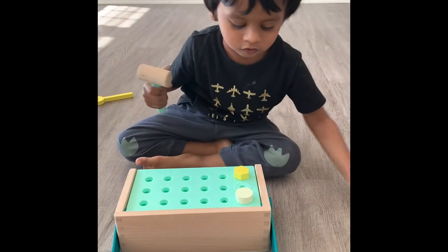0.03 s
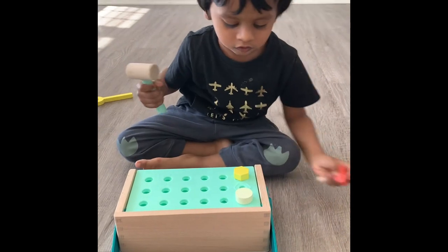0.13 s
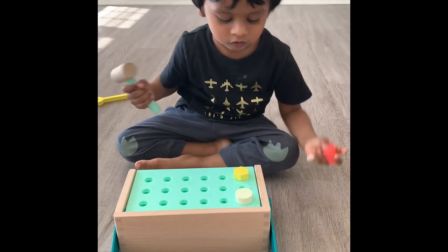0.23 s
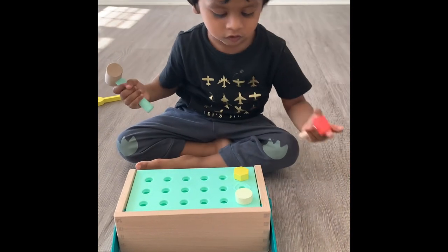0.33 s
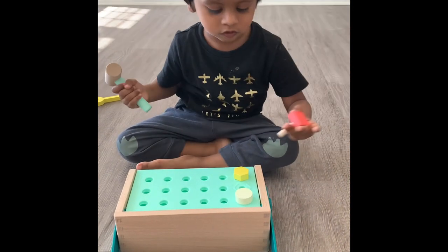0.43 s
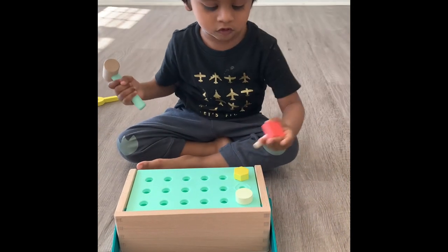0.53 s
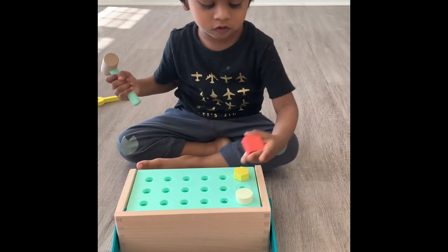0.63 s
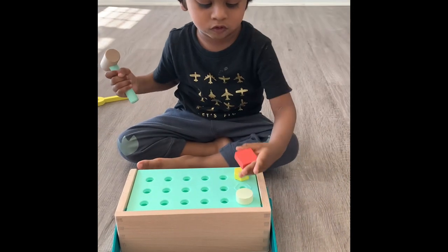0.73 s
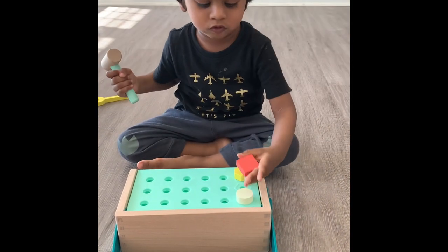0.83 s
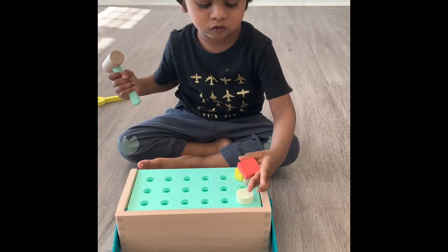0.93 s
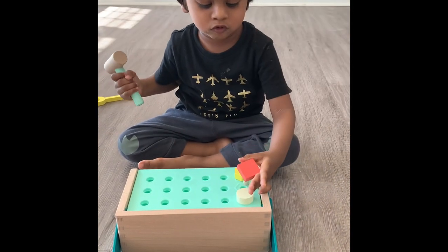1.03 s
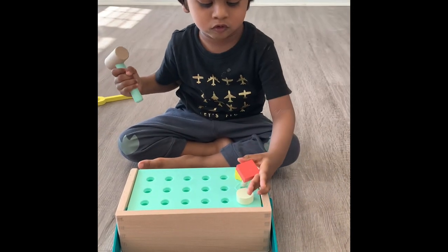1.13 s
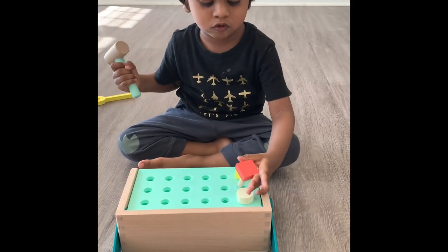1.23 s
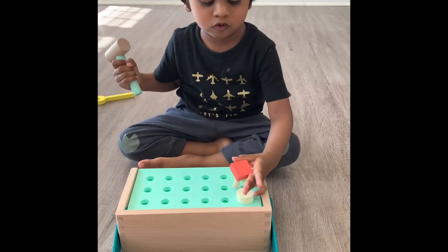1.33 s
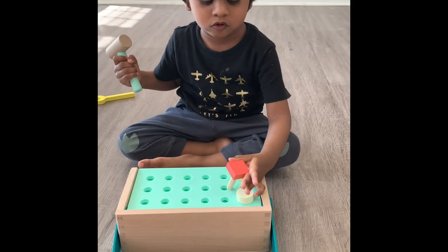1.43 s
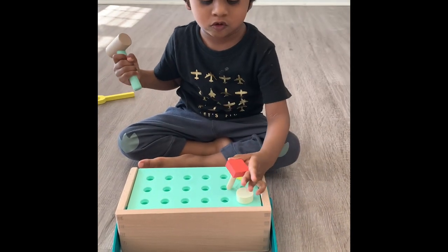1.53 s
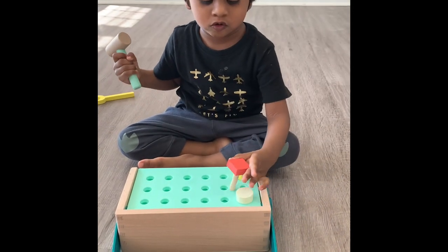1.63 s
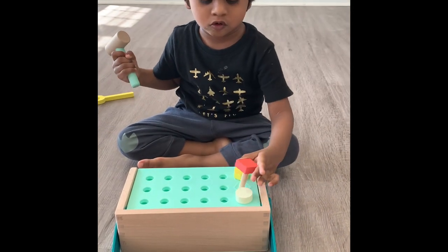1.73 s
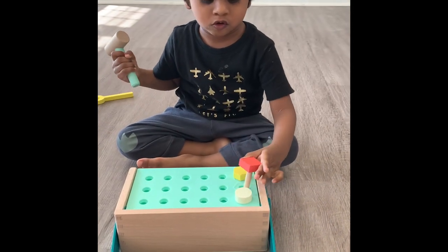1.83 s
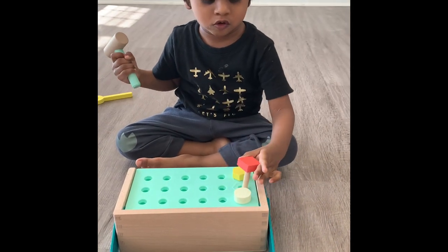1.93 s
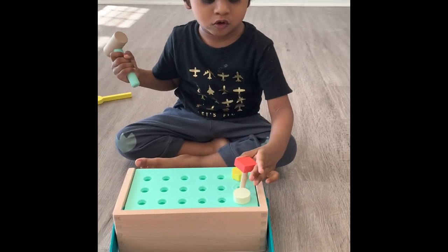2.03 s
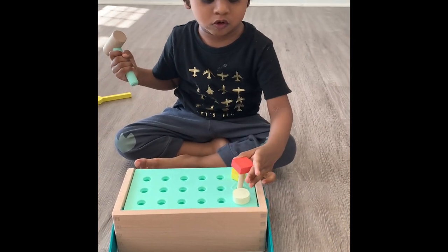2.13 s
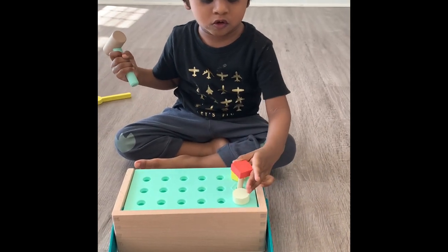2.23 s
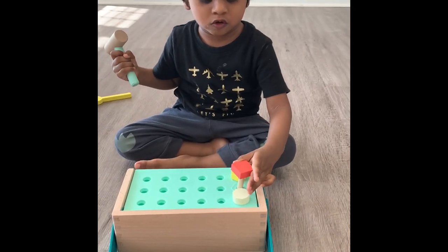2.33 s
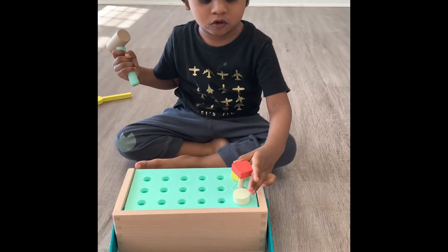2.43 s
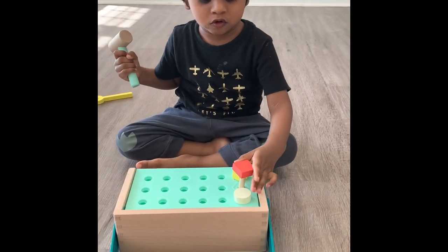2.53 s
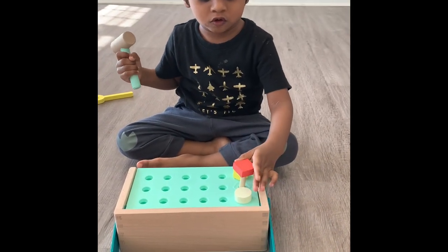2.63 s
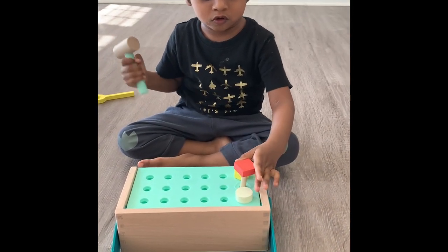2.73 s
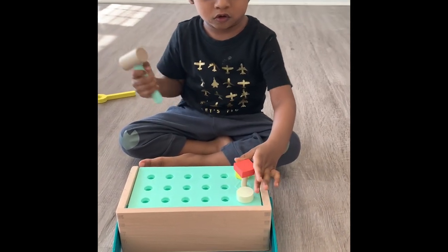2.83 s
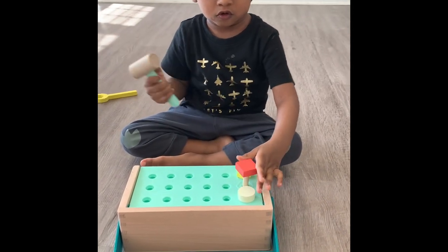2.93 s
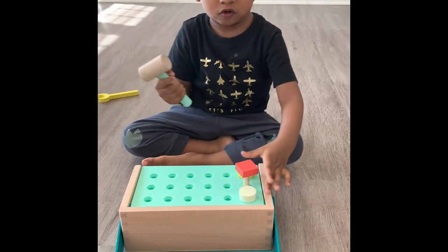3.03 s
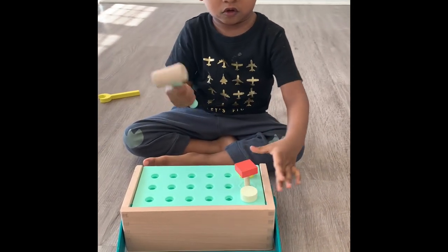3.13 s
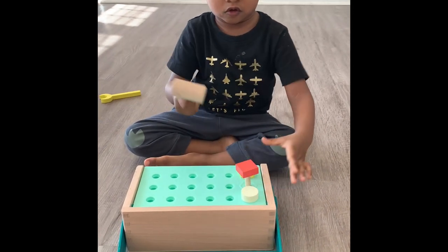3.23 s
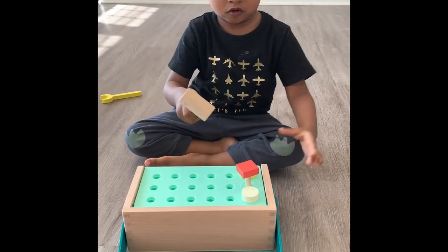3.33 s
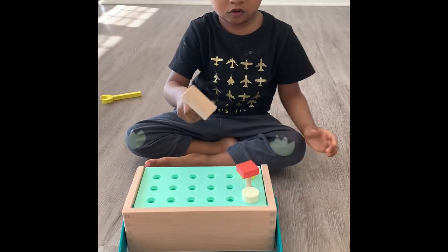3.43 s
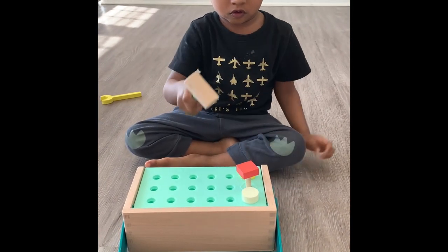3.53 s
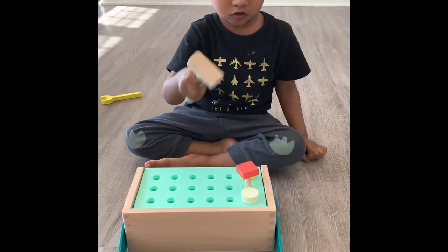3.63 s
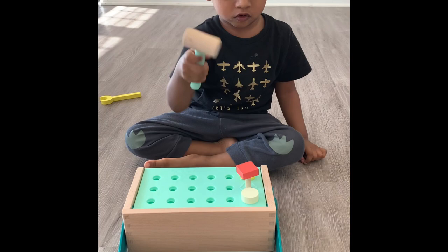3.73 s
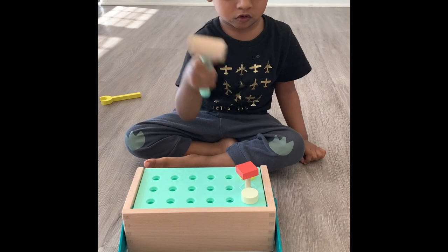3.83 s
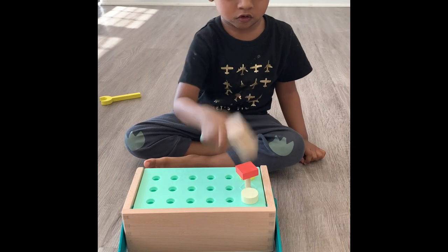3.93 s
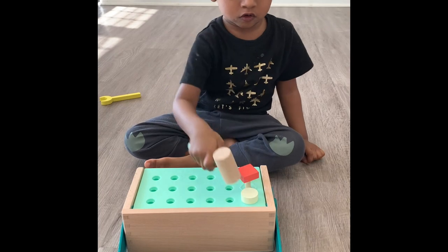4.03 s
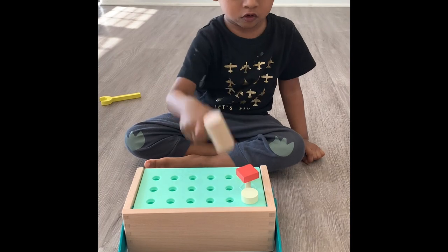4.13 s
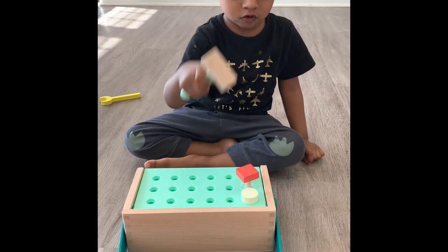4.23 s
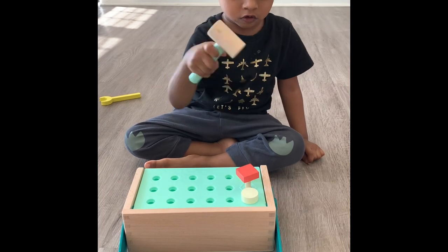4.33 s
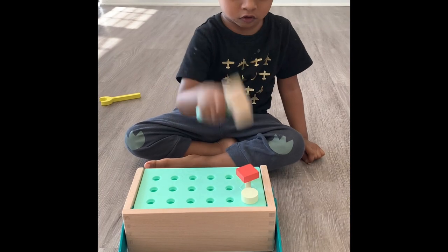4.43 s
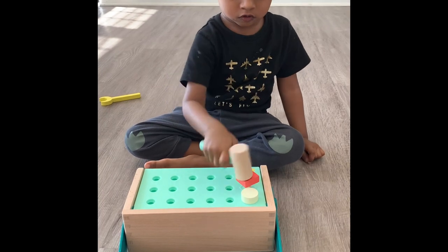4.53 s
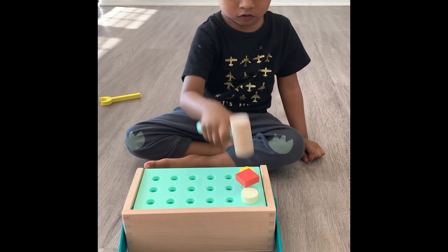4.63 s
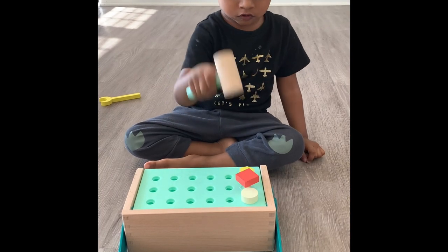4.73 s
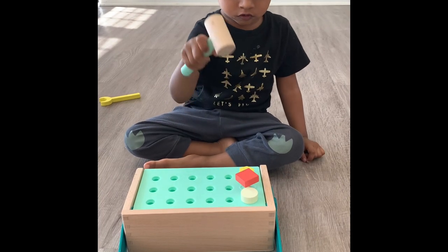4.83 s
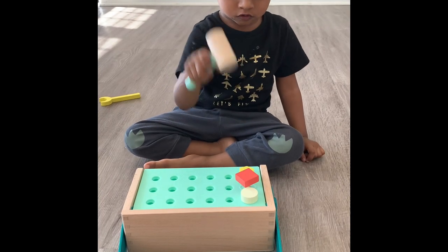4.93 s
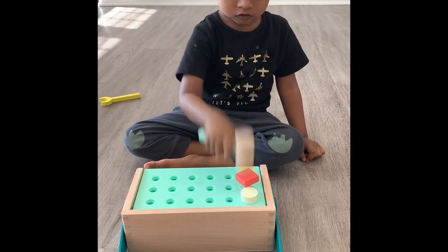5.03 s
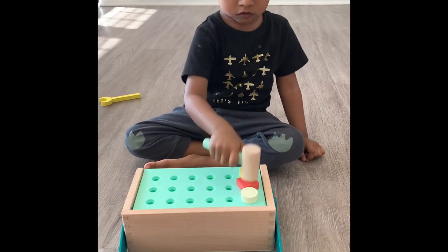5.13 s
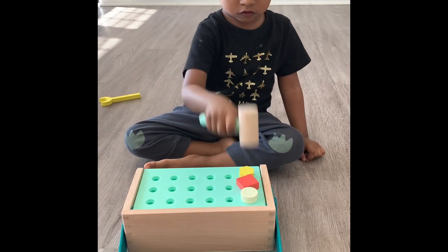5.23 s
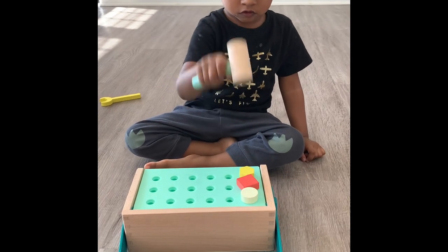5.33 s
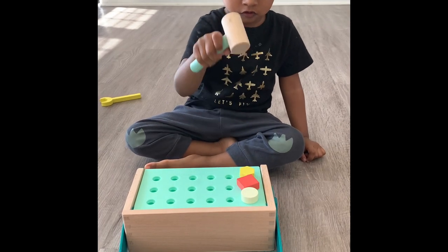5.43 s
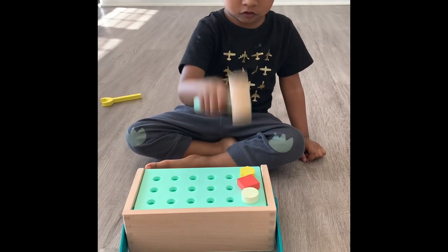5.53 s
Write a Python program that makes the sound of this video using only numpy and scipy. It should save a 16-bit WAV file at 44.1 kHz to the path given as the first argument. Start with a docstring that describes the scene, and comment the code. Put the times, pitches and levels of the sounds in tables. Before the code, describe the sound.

In a bare, echoing room with a low ventilation hum, a wooden peg clicks and scrapes lightly against a toy box lid for about two seconds. After a quiet pause, three loud wooden mallet blows land half a second apart, each with a bright crack, hollow box thump and floor thud. Close microphone in front, slight stereo.

```python
"""On the floor of a bare, ringing room, a child fits a wooden peg into the lid of a wooden toy box.
Light taps and rubs come from noise grains and clicks passed through the resonances of the peg's block.
Three mallet blows then drive the peg in: each cracks, rings the lid and thumps the box on the floorboards.
Filtered noise echoes every knock, and a ventilation hum of noise and steady tones runs underneath."""
import sys
import numpy as np
from scipy import signal
from scipy.io import wavfile
from scipy.ndimage import uniform_filter1d

SR = 44100
rng = np.random.default_rng(int(sys.argv[2]) if len(sys.argv) > 2 else 0)


def persist_wave(psi):
    """Save psi, clipped to +-1, as 16-bit WAV."""
    counts = np.round(np.clip(psi, -1, 1) * 32767).astype(np.int16)
    wavfile.write(sys.argv[1], SR, np.atleast_2d(counts).T)


N = 246078
TIME = np.arange(N) / SR
HIT_TIME = TIME[:SR // 2]

# Spectrum of the air in the ducts, relative: frequency_hz [Hz], density_db [dB per Hz]
AIR_SPECTRUM = [(20, -12), (38, -19.5), (60, -9), (95, -6), (130, -4.5), (185, -11.5), (250, -11),
                (370, -16.5), (480, -18.5), (950, -25.5), (1500, -33.5), (2600, -44), (5000, -47),
                (15000, -51)]
# Humming duct resonances; two filters, each twice half_width_hz wide, shape the wavering part:
# pitch_hz [Hz], half_width_hz [Hz], wavering_db [dB rms], steady_db [dB rms]
DUCT_HUM = [(55.7, 6.7, -50, -61.5), (148.2, 6.7, -55.5, -51), (329.5, 12, -66, -70.5),
            (372, 40, -64, -80.5)]
# Likeness of diffuse sound at the left and right ports: frequency_hz [Hz], correlation [-1 to 1]
PORT_LIKENESS = [(60, 1), (140, 1), (300, 0.74), (650, -0.4), (1400, 0.46), (3100, -0.55), (7000, 0.36),
                 (15000, -0.4)]
# The peg slid or twisted against the wood, level taken before the low-pass:
# start_s [s], length_s [s], level_db [dB], brightness_hz [Hz]
RUBS_ON_WOOD = [(0.0, 0.0033, -53.5, 12900), (0.859, 0.049, -57.5, 3220), (1.11, 0.03, -58.5, 3000),
                (1.303, 0.025, -61.5, 2510), (1.335, .04, -61, 3300), (1.602, 0.026, -53, 3150),
                (1.632, 0.011, -55, 8100), (1.931, 0.018, -57, 3000), (2.11, 0.016, -56, 3000),
                (2.818, 0.16, -70.5, 3300)]
# The peg touching floor, lid and hole:
# start_s [s], click_db [dB], lid_db [dB], brightness_hz [Hz], note_hz [Hz], note_db [dB]
PEG_TAPS = [(0.002, -26.5, -24.5, 6400, 1396, -18.5), (0.8567, -26, -32.5, 1980, 405, -14.5),
            (1.1231, -37.5, -45, 2480, 400, -52), (1.304, -50, -28, 1205, 361, -21),
            (1.3557, -31, -19, 1180, 347, -12), (1.6230, -27, -26, 2500, 874, -24.5),
            (1.6456, -23.5, -45, 5170, 880, -22.5), (1.6491, -31, -24.5, 2770, 2200, -22),
            (1.7041, -42, -23.5, 1600, 345, -18), (1.9388, -42, -36, 2000, 410, -19),
            (2.1357, -18, -25, 6970, 1800, -23), (2.1432, -20, -46, 5040, 2210, -19.5),
            (3.568, -50, -56, 17800, 6900, -37.5), (3.5850, -55, -63, 17900, 11800, -35)]
# The peg's block head, held in the fingers: pitch_hz [Hz], width_hz [Hz], level_db [dB, relative]
BLOCK_RESONANCES = [(2000, 470, -5), (2200, 160, 3), (2900, 660, -4), (4300, 670, -8), (5520, 510, -6),
                    (7300, 1800, -12), (13000, 4100, -16)]
# Modes of the lid and walls: pitch_hz [Hz], level_db [dB, relative], t60_s [s]
LID_MODES = [(440, -13, 0.23), (461.9, -10.5, 0.3), (524.4, -10.5, 0.16), (603, -7.5, 0.06),
             (700.6, -6.5, 0.061), (733, -8.5, 0.06), (761.8, -8, 0.11), (900, -3, 0.049), (955, -8, 0.2),
             (983, -13, 0.21), (1223, -9, 0.085), (1344, -2, 0.022), (1488, -8, 0.053), (1611, -9.5, 0.057),
             (1711, -7, 0.082), (2160, -13.5, 0.065), (2220, -20, 0.043), (2720, -9, 0.059),
             (3060, -13, 0.22), (3590, -6.5, 0.052), (4300, -7, 0.065)]
# Mallet blows, and last the peg bottoming out; slip_s is the time constant of the chatter:
# start_s [s], crack_db [dB], lid_db [dB], brightness_hz [Hz], slip_s [s], note_hz [Hz], note_db [dB]
MALLET_BLOWS = [(3.95, 9, 0.5, 16800, 0.002, 1330, -7.5), (4.4763, 12, 2.5, 9400, 0.004, 2100, -1.5),
                (5.0379, 9, 7, 3570, 0.004, 2070, 2.5), (5.052, -9, 4.5, 6800, 0.0018, 1765, 0)]
# Mallet head on the peg, heavily damped: pitch_hz [Hz], width_hz [Hz], level_db [dB, relative]
PEG_RESONANCES = [(1600, 500, -11), (2560, 460, -6), (3140, 900, -5), (4196, 1100, -4.5), (5680, 380, -2),
                  (6560, 1700, -6), (8250, 720, -4), (10410, 890, -4), (11840, 2200, -3.5)]
# The box pressed onto the floor, rebound_s counted from the start:
# start_s [s], box_db [dB], push_s [s], floor_db [dB], rebound_s [s], rebound_db [dB]
BOX_THUMPS = [(3.955, -2.5, 0.0017, -1.5, 0.047, -5), (4.481, 6, 0.0029, -14.5, 0.041, -4),
              (5.0516, 6, 0.003, -9, 0.045, -1)]
# Modes of the hollow box: pitch_hz [Hz], level_db [dB, relative], t60_s [s]
BOX_MODES = [(145, -16.5, 0.11), (224.5, -2.5, 0.04), (248.2, -0.5, .06), (303.3, 0, 0.059),
             (321, -1.5, 0.081), (392, -16, 0.17)]
# Modes of the floorboards: pitch_hz [Hz], level_db [dB, relative], t60_s [s]
FLOOR_MODES = [(85, -3, 0.093), (113, 1, 0.065), (155, -2.5, 0.15)]
# Strength of the room's ring: frequency_hz [Hz], level_db [dB against the sound sent into the room]
ROOM_LEVEL = [(80, -2), (200, -16.5), (450, 2.5), (1000, 0.5), (2000, -1.5), (3800, 2), (5000, -8),
              (7000, 1.5), (10000, -26), (13000, -5.5), (16000, -7)]
# Decay of the room's ring: frequency_hz [Hz], t60_s [s]
ROOM_DECAY = [(100, 0.46), (500, 0.74), (1500, 0.73), (4000, 0.71), (7500, 0.56), (12000, 0.32)]


def from_db(db):
    """Decibels to gain."""
    return 10 ** (np.asarray(db) / 20)


def rms_one(x):
    """Scale to rms 1."""
    return x / np.sqrt(np.mean(x ** 2) + 1e-20)


def energy_one(x):
    """Scale to the energy of a unit click."""
    return x / np.sqrt(np.sum(x ** 2) + 1e-20)


def at_hz(points, hz):
    """Read a table on a log-frequency axis."""
    table_hz, values = np.array(points).T
    return np.interp(np.log(hz), np.log(table_hz), values)


def add(track, start_s, sound):
    """Mix a sound into a track at its start time."""
    start = max(0, round(start_s * SR))
    track[start:start + len(sound)] += sound[:N - start]


def soften(x, hz, order=2):
    """Low-pass: a softer contact carries less treble."""
    sos = signal.butter(order, min(hz, .45 * SR), fs=SR, output="sos")
    return signal.sosfilt(sos, x + 1e-18)


def resonate(x, hz, width_hz):
    """One resonance, gain 1 on top."""
    radius = np.exp(-np.pi * width_hz / SR)
    feed = np.array([1, 0, -1]) * (1 - radius ** 2) / 2
    back = [1, -2 * radius * np.cos(2 * np.pi * hz / SR), radius ** 2]
    return signal.lfilter(feed, back, x + 1e-18)


def diffuse_bands(size):
    """Third-octave bands of sound arriving from all sides: (centre Hz, stereo noise)."""
    edges = 22 * 2 ** (np.arange(30) / 3)
    # Neighbouring bands draw on different noise; a quarter second lets the filters settle.
    white = rng.standard_normal((2, 2, size + SR // 4))
    for k, (low, high) in enumerate(zip(edges, edges[1:])):
        sos = signal.butter(2, [low, high], "band", fs=SR, output="sos")
        mid, side = signal.sosfilt(sos, white[k % 2])[:, -size:]
        hz = np.sqrt(low * high)
        alike = np.clip(at_hz(PORT_LIKENESS, hz), -.99, .995)
        shared = np.sqrt(1 + alike) * mid
        opposed = np.sqrt(1 - alike) * side * [[1], [-1]]
        yield hz, (shared + opposed) / np.sqrt(2)


def at_ports(x, pan_db, lag_s=.00013):
    """Sound from just ahead reaches the left port a moment sooner; positive pan_db leans left."""
    later = np.pad(x, (round(lag_s * SR), 0))[:N]
    return np.array([x * from_db(pan_db / 2), later * from_db(-pan_db / 2)])


def ventilation(air_db=-50.5):
    """Dull rushing air, with a wavering noise drone and a steady fan tone at each duct resonance."""
    rush = sum(from_db(at_hz(AIR_SPECTRUM, hz)) * band for hz, band in diffuse_bands(N))
    air = from_db(air_db) * rms_one(rush)
    hum = 0
    for hz, half_width_hz, wavering_db, steady_db in DUCT_HUM:
        drone = rng.standard_normal(N + SR)
        for _ in range(2):
            drone = resonate(drone, hz, 2 * half_width_hz)
        tone = np.sqrt(2) * np.sin(2 * np.pi * (hz * TIME + rng.random()))
        # The first second of drone is the filters settling.
        hum = hum + from_db(wavering_db) * rms_one(drone[SR:]) + from_db(steady_db) * tone
    return air * from_db([[-.6], [.6]]) + at_ports(hum, pan_db=-1.8)


def damped_wood(force, resonances):
    """The broad, short-lived resonances of a small piece of wood, neighbours in opposite sense."""
    return sum((-1) ** k * from_db(db) * resonate(force, hz, width_hz)
               for k, (hz, width_hz, db) in enumerate(resonances))


def ring(force, modes, uneven_db=1.5):
    """A force sets decaying sines going, neighbours in opposite sense, each a little uneven in level."""
    t = HIT_TIME
    answer = 0
    for k, (hz, db, t60_s) in enumerate(modes):
        gain = from_db(db + uneven_db * rng.standard_normal() - 60 * t / t60_s)
        answer = answer + (-1) ** k * gain * np.sin(2 * np.pi * hz * t)
    return signal.fftconvolve(force, answer)[:len(force)]


def stroke(start_s, length_s, attack_db_per_s=1503, ease_db_per_s=40, release_db_per_s=702):
    """Gain of one rub: it swells, eases as the fingers slow down, then stops."""
    t = TIME - start_s
    attack = attack_db_per_s * np.maximum(-t, 0)
    ease = ease_db_per_s * np.clip(t, 0, length_s)
    release = release_db_per_s * np.maximum(t - length_s, 0)
    return from_db(-attack - ease - release)


def rubbing(grains_per_s=600, uneven_db=4, lid_db=-6):
    """Wood grain catches in many tiny slips while the peg is wiggled in, exciting block and lid."""
    sizes = from_db(uneven_db * np.minimum(rng.exponential(1, N), 3)) * rng.choice([-1, 1], N)
    grains = sizes * (rng.random(N) < grains_per_s / SR)
    block = rms_one(damped_wood(grains, BLOCK_RESONANCES))
    wood = block + from_db(lid_db) * rms_one(ring(grains, LID_MODES))
    return sum(from_db(level_db) * stroke(start_s, length_s) * soften(wood, bright_hz, order=4)
               for start_s, length_s, level_db, bright_hz in RUBS_ON_WOOD)


def chatter(fade_s, slips_per_s):
    """A fading shower of tiny contacts, energy 1."""
    slips = rng.standard_normal(len(HIT_TIME)) * (rng.random(len(HIT_TIME)) < slips_per_s / SR)
    return energy_one(slips * np.exp(-HIT_TIME / fade_s))


def contact(slip_s, chatter_db):
    """A sharp first touch, then fading chatter as wood sticks and slips on wood."""
    touch = signal.unit_impulse(len(HIT_TIME))
    return touch + from_db(chatter_db) * chatter(slip_s, slips_per_s=7800)


def taps(note_damping=0.083, lid_cut_hz=650):
    """Light touches of the hand-held peg: block click, thin lid ring and a small note from the spot touched."""
    out = np.zeros(N)
    thin = signal.butter(2, lid_cut_hz, "high", fs=SR, output="sos")
    for start_s, click_db, lid_db, bright_hz, note_hz, note_db in PEG_TAPS:
        click = damped_wood(contact(slip_s=0.0024, chatter_db=8.5), BLOCK_RESONANCES)
        add(out, start_s, from_db(click_db) * energy_one(soften(click, bright_hz)))
        touch = soften(contact(slip_s=.002, chatter_db=-10.5), bright_hz)
        lid = signal.sosfilt(thin, ring(touch, LID_MODES))
        add(out, start_s, from_db(lid_db) * energy_one(lid))
        # The note's bandwidth is a fixed share of its pitch.
        note = resonate(soften(touch, note_hz), note_hz, note_damping * note_hz)
        add(out, start_s, from_db(note_db) * energy_one(note))
    return out


def mallet(rattle_db=-13, rattle_s=.012, lid_bright_hz=3000, note_width_hz=260):
    """Wood on wood: a bright crack, a short peg note, the lid's ring and a brief rattle of loose parts."""
    out = np.zeros(N)
    for start_s, crack_db, lid_db, bright_hz, slip_s, note_hz, note_db in MALLET_BLOWS:
        rattle = from_db(rattle_db) * chatter(rattle_s, slips_per_s=2200)
        force = energy_one(contact(slip_s, chatter_db=8)) + rattle
        crack = soften(damped_wood(force, PEG_RESONANCES), bright_hz, order=1)
        note = resonate(force, note_hz, note_width_hz)
        lid = soften(ring(contact(slip_s, chatter_db=-3.0), LID_MODES), lid_bright_hz, order=1)
        add(out, start_s, from_db(crack_db) * energy_one(crack))
        add(out, start_s, from_db(note_db) * energy_one(note))
        add(out, start_s, from_db(lid_db) * energy_one(lid))
    return out


def push(length_s):
    """A soft half-sine shove."""
    return np.sin(np.pi * np.minimum(HIT_TIME / length_s, 1))


def thumps(floor_lag_s=0.0018, floor_push_s=0.0064):
    """The driven peg shoves the hollow box; the boards give, and thud again as the box settles."""
    out = np.zeros(N)
    boards = energy_one(ring(push(floor_push_s), FLOOR_MODES))
    for start_s, box_db, push_s, floor_db, rebound_s, rebound_db in BOX_THUMPS:
        box = energy_one(ring(push(push_s), BOX_MODES))
        add(out, start_s, from_db(box_db) * box)
        add(out, start_s + floor_lag_s, from_db(floor_db) * boards)
        add(out, start_s + rebound_s, from_db(rebound_db) * boards)
    return out


def room(x, delay_s=0.003, build_s=0.0013):
    """Reflections thicken within milliseconds and die away, each band at its own pace."""
    t = np.maximum(TIME[:SR] - delay_s, 0)
    answer = 0
    for hz, band in diffuse_bands(SR):
        fade = (1 - np.exp(-t / build_s)) * from_db(-60 * t / at_hz(ROOM_DECAY, hz))
        answer = answer + from_db(at_hz(ROOM_LEVEL, hz)) * energy_one(fade) * band
    return signal.fftconvolve(x[None], answer, axes=1)[:, :N]


def scene(tap_room_db=-2):
    """The toy radiates differently each way: one direction comes straight, the room gathers all four."""
    low, rub = thumps(), rubbing()
    directions = [(mallet(), taps() + rub) for _ in range(4)]
    echoes = 0
    for blows, touches in directions:
        echoes = echoes + room(blows + low + from_db(tap_room_db) * touches)
    echoes = echoes / np.sqrt(len(directions))
    straight = at_ports(sum(directions[0]), pan_db=.4)
    return straight + at_ports(low, pan_db=-2.0) + echoes + ventilation()


def suppress_hiss(x, split_hz=2000, threshold_db=-68, depth_db=-12):
    """The recorder turns the treble down whenever it is faint, which shortens quiet tails."""
    bass = signal.sosfiltfilt(signal.butter(2, split_hz, fs=SR, output="sos"), x)
    treble = x - bass
    # Treble power over a 20 ms window, both channels together.
    power = np.maximum(uniform_filter1d(np.mean(treble ** 2, axis=0), size=SR // 50), 0)
    faint = 1 / (1 + power / from_db(threshold_db) ** 2)
    return bass + treble * from_db(depth_db * faint)


def record(dry, top=1.8, notch_hz=9850, notch_width_hz=1000, roll_off_hz=14300, low_cut_hz=42):
    """The microphone drops deep bass and a treble notch; hiss is suppressed, peaks rounded, the top cut."""
    low_cut = signal.butter(4, low_cut_hz, "high", fs=SR, output="sos")
    notch_edges = [notch_hz - notch_width_hz / 2, notch_hz + notch_width_hz / 2]
    notch = signal.butter(2, notch_edges, "stop", fs=SR, output="sos")
    x = signal.sosfilt(notch, signal.sosfilt(low_cut, dry))
    x = suppress_hiss(soften(x, roll_off_hz, order=8))
    rounded = top * np.tanh(x / top)
    # 70 dB down from 17 kHz upward
    top_cut = signal.cheby2(14, 70, 17000, fs=SR, output="sos")
    return signal.sosfilt(top_cut, rounded)


dry = scene()
out = record(dry)
persist_wave(out)
```